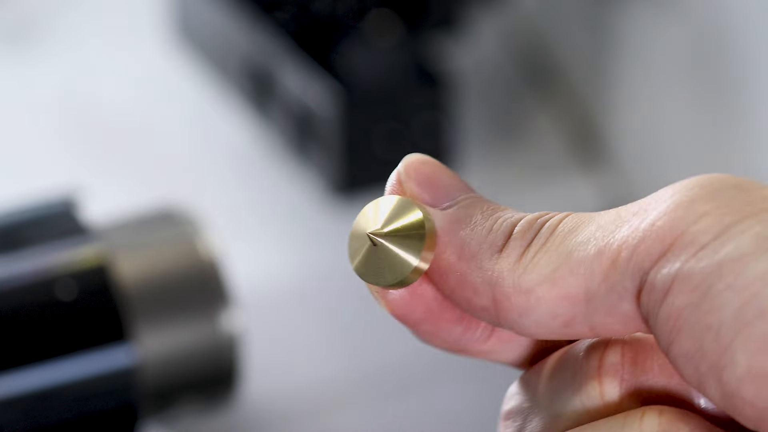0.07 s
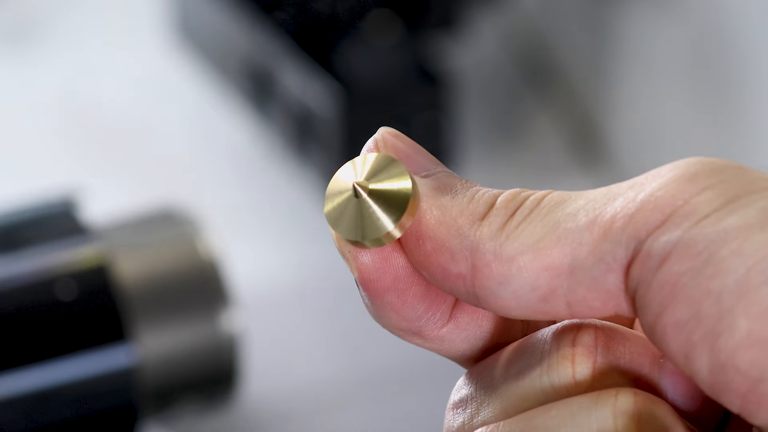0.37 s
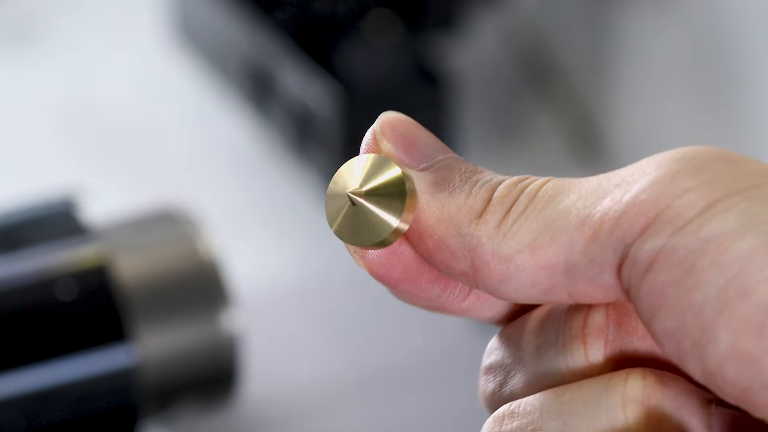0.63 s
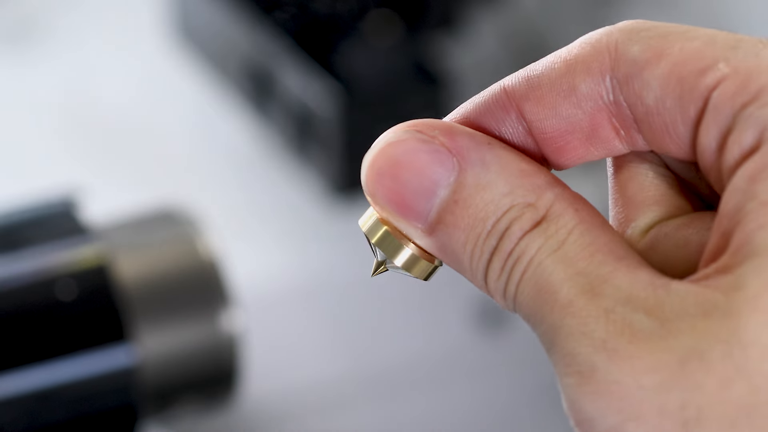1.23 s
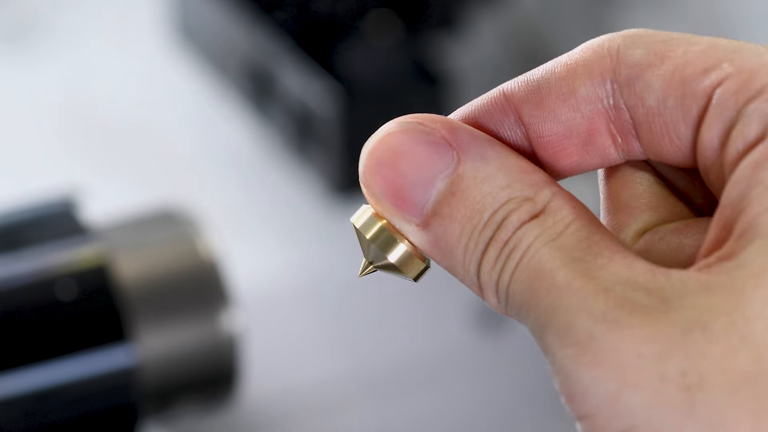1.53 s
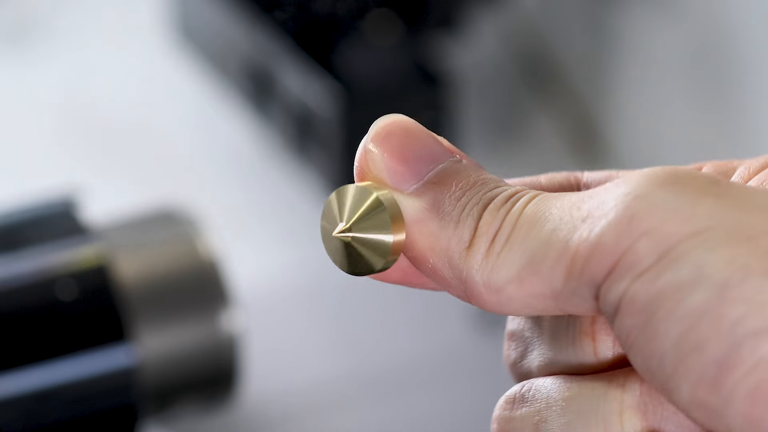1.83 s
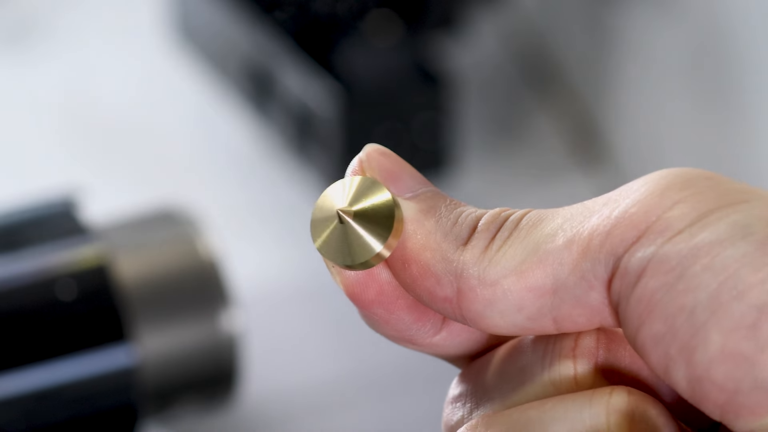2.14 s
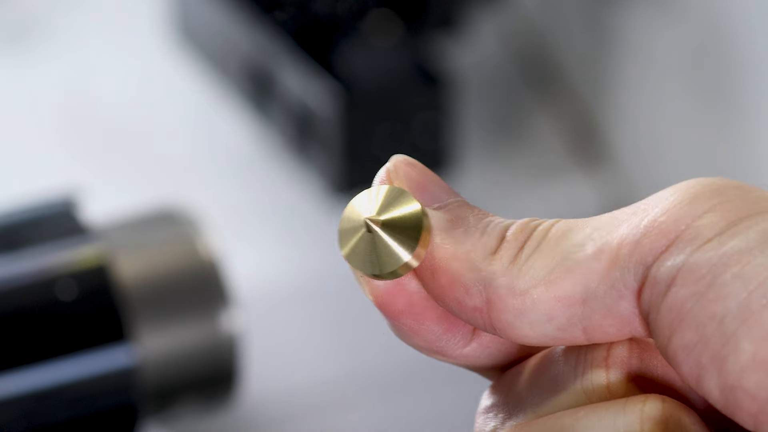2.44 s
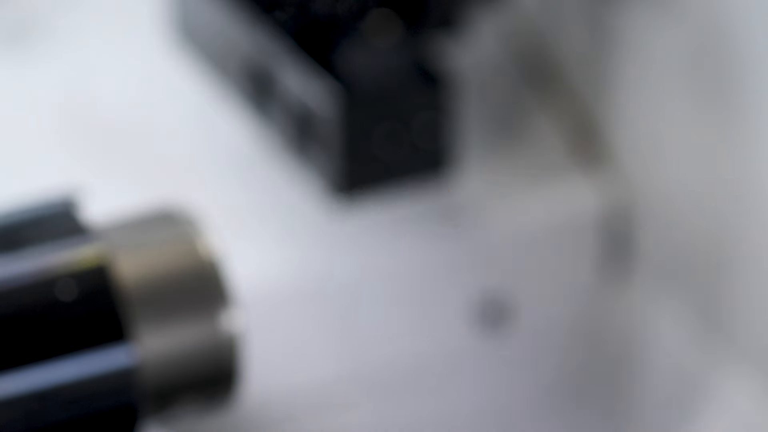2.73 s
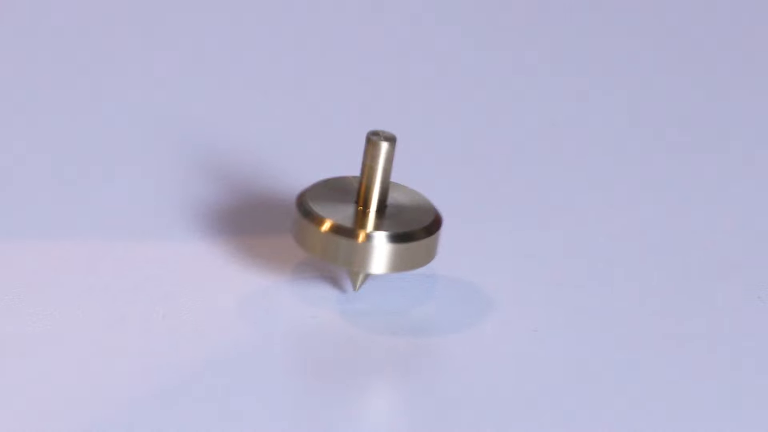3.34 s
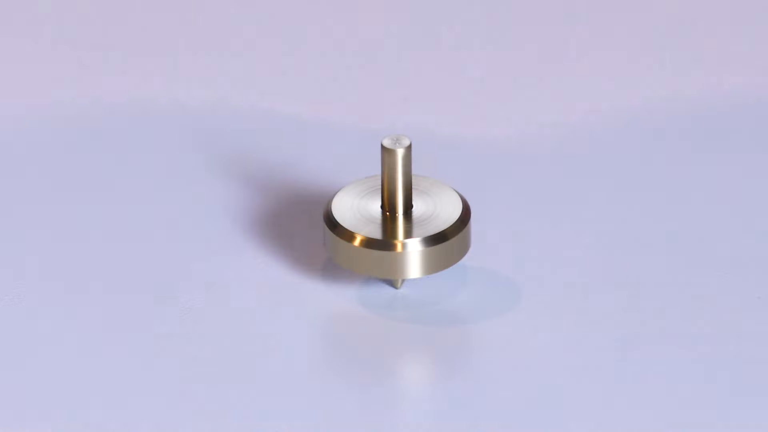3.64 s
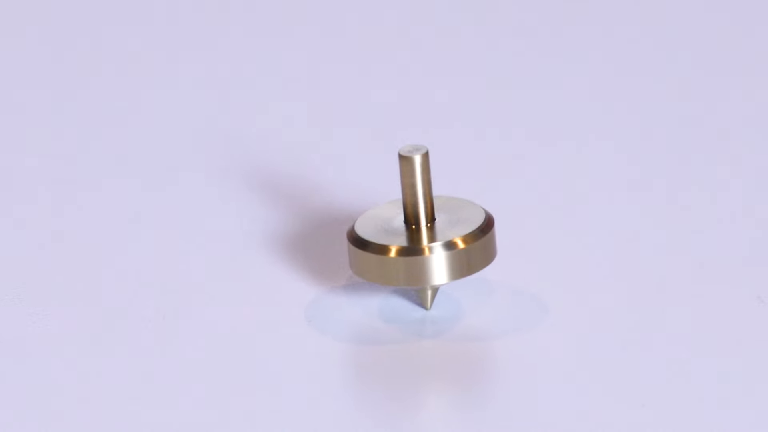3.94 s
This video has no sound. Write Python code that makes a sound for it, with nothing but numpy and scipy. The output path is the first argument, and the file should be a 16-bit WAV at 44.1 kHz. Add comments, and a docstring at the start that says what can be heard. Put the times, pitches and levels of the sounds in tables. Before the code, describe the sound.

A workshop machine runs with rushing air, a motor hum and a whine swelling about twice a second, fading out just before 3 seconds. In a quieter room, at 3.2 seconds, a small metal top hits a hard table close by with a loud knock and a low thud. It bounces faster and softer until about 3.6 seconds, then spins with a soft grinding and small scrapes.

```python
"""Workshop machine, then a spinning top

One microphone in a workshop: a machine's rushing air, motor hum and a whine that swells about twice
a second. It fades away just before 3 s. Then a quieter room: a small metal top is dropped spinning
on a hard table near the microphone. Its tip bounces ever faster, each contact knocking the tabletop,
then stays down and grinds softly as it spins. The first hit overloads the microphone with a low thud."""
import sys
import numpy as np
from scipy import signal
from scipy.fft import rfft, irfft, next_fast_len
from scipy.io import wavfile
from scipy.ndimage import map_coordinates

SR = 44100
rng = np.random.default_rng(int(sys.argv[2]) if len(sys.argv) > 2 else 0)


def master_out(mix):
    """Clip the mix to full scale and print it as 16-bit PCM to the path in sys.argv[1]."""
    frames = np.transpose(np.atleast_2d(mix))
    ceiling = np.clip(frames, -1, 1)
    pcm = np.round(ceiling * 32767).astype(np.int16)
    wavfile.write(sys.argv[1], SR, pcm)


N = 4 * SR


def amp(db):
    """Decibels to gain."""
    return 10 ** (np.asarray(db) / 20)


def unit(x):
    """x at rms 1."""
    return x / np.sqrt(np.mean(x ** 2) + 1e-20)


def along(points, hz):
    """(Hz, value) points read off at hz, on a log frequency axis."""
    point_hz, values = np.transpose(points)
    return np.interp(np.log(hz + 1), np.log(point_hz + 1), values)


def curve(points):
    """(seconds, value) points as one value per sample."""
    return np.interp(np.arange(N) / SR, *np.transpose(points))


def wobble(rate):
    """A smooth random curve, rate knots a second."""
    return map_coordinates(rng.standard_normal(N // 20), [np.arange(N) * rate / SR])


def fade(t, t60):
    """A decay that loses 60 dB in t60 seconds."""
    return np.exp(-np.log(1000) * t / t60)


def filtered(x, response):
    """x through a filter whose gain is response(hz)."""
    size = next_fast_len(N + SR // 2)
    return irfft(rfft(x, size) * response(np.fft.rfftfreq(size, 1 / SR)), size)[:N]


def noise(spectrum):
    """Noise of rms 1, coloured by (Hz, dB) points."""
    return unit(filtered(rng.standard_normal(N), lambda hz: amp(along(spectrum, hz))))


def resonances(hz, peaks):
    """Gain of steep-sided resonances: each is a band-pass applied twice."""
    return sum(amp(db) * (1j * hz * width / (centre ** 2 - hz ** 2 + 1j * hz * width)) ** 2
               for centre, width, db in peaks)


def resonate(x, peaks):
    """x through the resonances, at rms 1."""
    return unit(filtered(x, lambda hz: resonances(hz, peaks)))


def snap(spectrum, size=2048):
    """The shortest causal (minimum-phase) click with this spectrum."""
    gain = amp(along(spectrum, np.fft.rfftfreq(size, 1 / SR)))
    cepstrum = irfft(np.log(gain))
    cepstrum[1:size // 2] *= 2
    cepstrum[size // 2 + 1:] = 0
    return irfft(np.exp(rfft(cepstrum)))


def play(events, sound):
    """The sound started at each (seconds, dB)."""
    impulses = np.zeros(N + SR)
    for start, db in events:
        impulses[round(start * SR)] += amp(db)
    return signal.fftconvolve(impulses, sound)[:N]


def tone(hz, drift_hz):
    """A slightly unsteady sine of rms 1."""
    return unit(np.sin(2 * np.pi * np.cumsum(hz + drift_hz * wobble(6.67)) / SR))


def room_tone():
    """Low, quiet room noise that dips under the bounces."""
    # Each row: time in seconds, level in dB.
    level = [(3.19, -43.5), (3.23, -50), (3.42, -49), (3.6, -45.5)]
    # Each row: frequency in Hz, relative noise density in dB.
    spectrum = [(25, -25), (45, -5), (110, -2), (200, -4), (350, -3.5), (600, -8), (1500, -18),
                (3000, -24.5), (5000, -37.5), (10000, -37.5), (16000, -45)]
    return amp(curve(level)) * noise(spectrum)


def near_walls(x, count=40, dull_hz=3080):
    """Dull early reflections, reaching the microphone 3 to 14 ms behind the direct sound."""
    delays_s = 0.011 * (0.24 + rng.random(count))
    gains = rng.choice([-1, 1], count) / np.sqrt(count)
    echoes = signal.fftconvolve(x, np.bincount((delays_s * SR).astype(int), gains))[:N]
    return amp(-16) * filtered(echoes, lambda hz: 1 / (1 + 1j * hz / dull_hz))


def room_tail(x):
    """The room's diffuse reverberation, in which a few modes hang on."""
    # Each row: frequency in Hz, seconds to fall 60 dB.
    decay_times = [(200, 0.66), (900, 0.95), (2200, 1), (5000, 0.59), (12000, 0.9)]
    # Each row: frequency in Hz, relative gain in dB.
    colour = [(200, -14), (500, -1), (800, -2), (1500, -3), (2100, 4), (3300, -2), (4200, 1.5), (5500, -10),
              (8000, -10), (11500, -8.5), (15000, -12)]
    # Each row: centre in Hz, width in Hz, relative gain in dB.
    modes = [(1089, 36, -3.5), (1540, 73, -3), (2075, 35, 11), (2600, 60, -11)]
    band_hz, t, bands = signal.stft(rng.standard_normal(SR), SR, nperseg=256)
    tail = signal.istft(bands * fade(t, along(decay_times, band_hz)[:, None]), SR)[1]
    wet = signal.fftconvolve(x, tail / np.linalg.norm(tail))[:N]
    return amp(-10) * filtered(wet, lambda hz: amp(along(colour, hz)) + amp(2.5) * resonances(hz, modes))


def short_echoes(x, treble_from_hz=4700):
    """x plus dense short echoes, which ripple mostly its treble."""
    t = np.arange(SR // 5) / SR
    echoes = rng.standard_normal(len(t)) * fade(t, t60=0.076)
    wet = signal.fftconvolve(x, echoes / np.linalg.norm(echoes))[:N]
    return x + amp(-6.5) * filtered(wet, lambda hz: hz / (hz + treble_from_hz))


def machine(whine_period_s=0.527, whine_crest_s=0.205):
    """Rushing air, the ringing housing, the motor's hum and a whine that swells in cycles."""
    # Each row: frequency in Hz, relative noise density in dB.
    air_spectrum = [(25, -48), (46, -24.5), (100, -7), (190, -4.5), (350, -6), (700, -5.5), (1100, -10.5),
                    (1600, -10.5), (2200, -15.5), (3200, -23), (4300, -30), (5500, -34.5), (8200, -35),
                    (10500, -36.5), (13000, -47.5), (16000, -62)]
    # Each row: centre in Hz, width in Hz, relative gain in dB.
    housing_modes = [(144, 16, -2.5), (198.4, 21.3, 1.5), (689, 22, -10), (895, 13.6, 1), (2585, 32, -12.5),
                     (7170, 660, -28.5), (9470, 1440, -32), (11200, 300, -31.5)]
    # Motor tones and thin whistles. Each row: frequency in Hz, level in dB before the fader.
    motor_tones = [(491, -37), (981.4, -38), (1963, -49.5), (4500, -67), (6969, -66), (7200, -63.5),
                   (7338, -69), (9000, -63), (9690, -73), (10185, -73)]
    # Each row: time in seconds, gain of the whole machine in dB; the last value holds.
    fader = [(0, -0.5), (2.68, -0.5), (2.82, -2.5), (2.92, -8.5), (2.955, -15.5), (2.985, -30)]
    air = amp(-27.5) * noise(air_spectrum)
    housing = amp(-36) * resonate(rng.standard_normal(N), housing_modes)
    hum = sum(amp(db + 0.5 * wobble(7.3)) * tone(hz, drift_hz=0.68) for hz, db in motor_tones)
    cycle = np.cos(2 * np.pi * (np.arange(N) / SR - whine_crest_s) / whine_period_s)
    swell_db = 7 * np.tanh(2 * cycle + 0.5)
    whine = amp(-42.5 + swell_db) * tone(hz=1717.6, drift_hz=0.5)
    return amp(curve(fader)) * (short_echoes(air + housing) + hum + whine)


def fingers():
    """Fingers slip off the stem with a faint hiss as the top is let go."""
    # Each row: start in seconds, level in dB.
    slips = [(3.139, -49), (3.179, -73)]
    # Each row: frequency in Hz, relative noise density in dB.
    hiss_spectrum = [(1000, -23), (5000, -12), (7500, 5), (11000, 2), (16000, -15)]
    t = np.arange(SR // 4) / SR
    return play(slips, fade(t, t60=0.1)) * noise(hiss_spectrum)


def spinning_tip(roughness_db=1.5, skid_rise_s=0.006):
    """From the last bounces on, the tip grinds unevenly on the table and skids now and then."""
    # The tip's pressure on the table. Each row: time in seconds, grinding level in dB.
    pressure = [(3.46, -62), (3.5, -34), (3.56, -30.5), (3.62, -41), (3.74, -41), (3.8, -41), (3.91, -43.5),
                (4, -41)]
    # Each row: centre in Hz, width in Hz, relative gain in dB.
    grind_modes = [(750, 170, 4), (1160, 190, -1.5), (1270, 130, -5.5), (1496, 150, -1), (2200, 720, -16)]
    # Short scrapes. Each row: start in seconds, level in dB.
    skids = [(3.673, -41.5), (3.757, -39.5), (3.789, -30), (3.820, -41), (3.929, -34), (3.984, -28)]
    t = np.arange(N) / SR
    friction = rng.standard_normal(N) * amp(roughness_db * wobble(110))
    skid_shape = fade(t, t60=0.11) * (1 - np.exp(-t / skid_rise_s))
    envelope = amp(curve(pressure)) + play(skids, skid_shape)
    touching = t > pressure[0][0]
    return touching * envelope * resonate(friction, grind_modes)


def table_ring(attack_s=0.00066):
    """The tabletop's short ring after one contact: decaying modes of alternating sign."""
    # Each row: frequency in Hz, relative level in dB, seconds to fall 60 dB.
    modes = [(653, -4.5, 0.014), (772, -3, 0.028), (922, -9.5, 0.046), (1098, -4.5, 0.037),
             (1166, -2, 0.026), (1267, -10.5, 0.023), (1478, 0, .036), (1630, -4.5, 0.017),
             (2326, -4, 0.011), (2580, -7.5, 0.028), (3280, -8.5, 0.023), (3270, -23, .013),
             (6570, -23, 0.023), (7200, -23, 0.013)]
    t = np.arange(SR // 8) / SR
    ring = sum((-1) ** k * amp(db) * fade(t, t60) * np.sin(2 * np.pi * hz * t)
               for k, (hz, db, t60) in enumerate(modes))
    return amp(-4) * ring * (1 - np.exp(-t / attack_s))


def frame_ring(hz=359.5):
    """The slow, low ring of the table's frame after one contact."""
    t = np.arange(SR // 2) / SR
    return amp(-41.5) * fade(t, t60=0.27) * np.sin(2 * np.pi * hz * t)


def bounces(tick_delay_s=0.001802, table_low_hz=452):
    """Each contact knocks and rings the table; harder ones tick more brightly."""
    # Each row: start in seconds, strength in dB, extra gain of the tick in dB.
    contacts = [(3.204, 1.5, 9), (3.2624, -0.5, 4.5), (3.3346, 0, 2), (3.3828, -3.5, 3), (3.4253, -4, -3),
                (3.4589, -5.5, -1), (3.4863, -9.5, -4), (3.5053, -12.5, -8), (3.5195, -15.5, -8),
                (3.528, -16, -9), (3.5364, -22, -7), (3.5438, -27, -7), (3.5490, -20, -8),
                (3.5540, -29, -10), (3.558, -29, -0.5)]
    # Three click spectra. Each row: frequency in Hz, relative level in dB.
    knock_spectrum = [(100, -46), (480, -35), (750, -3), (990, -9), (1300, 6), (3300, -1), (4500, -13),
                      (7000, -19.5), (11000, -30.5), (16000, -41)]  # the sharp onset of a contact
    tick_spectrum = [(400, -32), (1300, 0), (3200, 5.5), (5200, -6.5), (6800, 2.5), (9800, -5.5),
                     (12000, -18), (16000, -28)]  # the bright tick that follows it off a near surface
    overload_spectrum = [(25, -16), (90, -15), (300, -4), (600, 7), (2000, -38)]  # low thud of the microphone overloading on the first, loudest hit
    blows = [(start, db) for start, db, _ in contacts]
    reflections = [(start + tick_delay_s, db + treble_db) for start, db, treble_db in contacts]
    knocks = amp(17) * play(blows, snap(knock_spectrum))
    ticks = amp(3) * play(reflections, snap(tick_spectrum))
    overload_thud = amp(9.5) * play(blows[:1], snap(overload_spectrum))
    # The tabletop radiates little bass.
    low_cut = signal.butter(2, table_low_hz, "highpass", fs=SR, output="sos")
    tabletop = signal.sosfilt(low_cut, play(blows, table_ring()) + knocks + ticks)
    return tabletop + play(blows, frame_ring()) + overload_thud


def scene():
    """The machine, then the top with its bounces echoing in the room, over room tone; mono."""
    knocks = bounces()
    direct = machine() + fingers() + knocks
    reverberation = near_walls(knocks) + room_tail(knocks)
    return (direct + reverberation + spinning_tip() + room_tone())[None]


def record(dry, band_limit_hz=16400):
    """The loudest knocks clip at full scale; nothing is kept above the band limit."""
    clipped = np.clip(dry[0], -1, 1)
    return filtered(clipped, lambda hz: hz < band_limit_hz)[None]


dry = scene()
out = record(dry)
master_out(out)
```